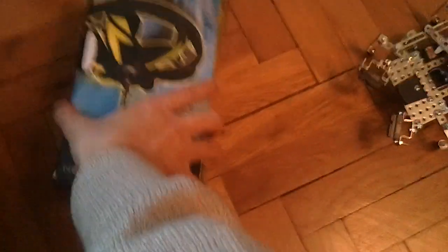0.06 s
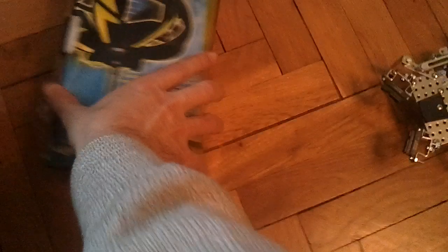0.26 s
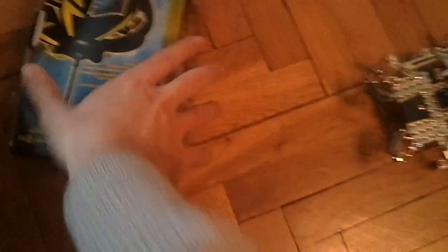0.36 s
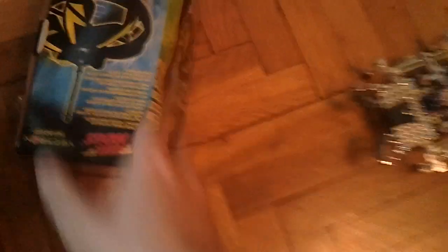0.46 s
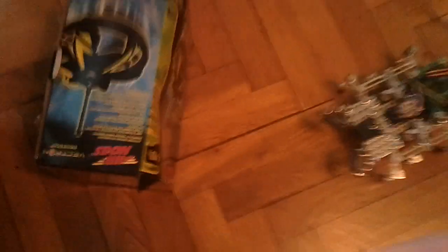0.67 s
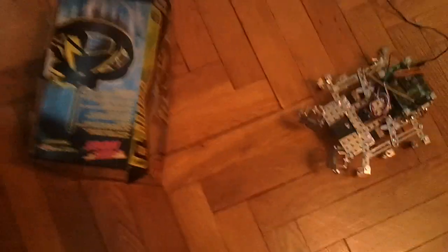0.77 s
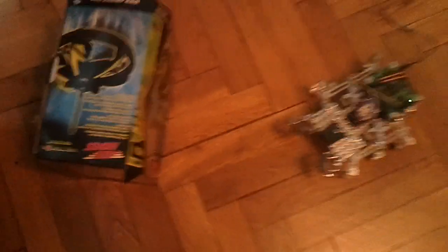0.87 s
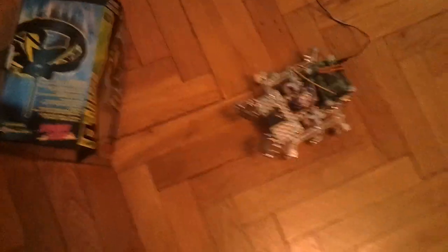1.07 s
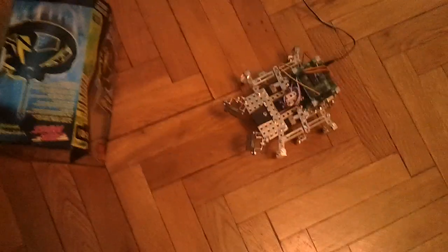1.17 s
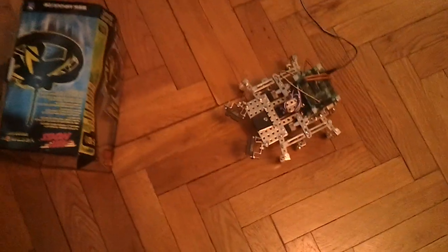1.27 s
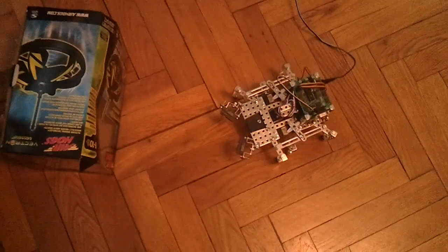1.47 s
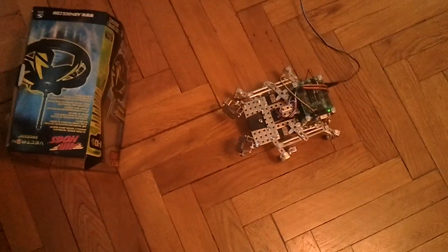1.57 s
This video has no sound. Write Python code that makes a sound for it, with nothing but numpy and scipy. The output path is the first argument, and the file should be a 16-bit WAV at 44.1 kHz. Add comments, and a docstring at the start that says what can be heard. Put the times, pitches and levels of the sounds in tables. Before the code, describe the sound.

A small robot's servos buzz while a cardboard box thumps onto a wooden floor.

```python
"""A quiet room with a wooden floor and a faint hum. A small walking robot works its servos in
three moves, gear teeth ticking and rubbing into a dense, bright buzz. Beside it a cardboard box
is lowered, scuffs along the boards and drops flat with a thump, its panels ringing briefly.
A few dry ticks and soft low bumps follow."""
import sys
import numpy as np
from scipy import signal
from scipy.fft import rfft, irfft, next_fast_len
from scipy.io import wavfile
from scipy.ndimage import uniform_filter1d, map_coordinates

SR = 44100
rng = np.random.default_rng(int(sys.argv[2]) if len(sys.argv) > 2 else 0)


def unload_audio(sound):
    """Save the sound as a 16-bit wav file, at the path given as the first command line argument."""
    columns = np.transpose(np.atleast_2d(sound))
    # keep every value between -1 and 1, then stretch to whole-number steps
    steps = np.round(np.clip(columns, -1, 1) * 32767)
    wavfile.write(sys.argv[1], SR, steps.astype(np.int16))


N = 70560
TIME = np.arange(N) / SR


def amp(db):
    return 10 ** (np.asarray(db) / 20)


def unit(x):
    """Scale to rms 1."""
    return x / np.sqrt(np.mean(x ** 2) + 1e-20)


def along(points, hz):
    """Read (Hz, value) points on a log axis."""
    freqs, values = np.transpose(points)
    return np.interp(np.log(hz + 1), np.log(freqs + 1), values)


def fader(rows):
    """Gain per sample from (seconds, dB) rows."""
    return amp(np.interp(TIME, *np.transpose(rows)))


def wobble(rate):
    """A smooth random curve, rate knots a second."""
    return map_coordinates(rng.standard_normal(1024), [TIME * rate], mode="wrap")


def decay(t60, t=TIME):
    """Fall 60 dB in t60 seconds."""
    return amp(-60 * t / t60)


def delayed(x, start):
    return np.pad(x, (round(start * SR), 0))[:N]


def filtered(x, response):
    """Shape x by a gain for each frequency."""
    size = next_fast_len(N + SR // 2)
    return irfft(rfft(x, size) * response(np.fft.rfftfreq(size, 1 / SR)), size)[:N]


def coloured(x, eq):
    """x through an EQ curve, at rms 1."""
    return unit(filtered(x, lambda hz: amp(along(eq, hz))))


def noise(eq):
    return coloured(rng.standard_normal(N), eq)


def resonance(hz, width):
    """Noise in one narrow band, rms 1."""
    return unit(filtered(rng.standard_normal(N), lambda f: 1 / (1 + (2 * (f - hz) / width) ** 2)))


def snap(eq, size=8192):
    """One minimum-phase pulse coloured by an EQ curve, peak 1."""
    cepstrum = irfft(np.log(amp(along(eq, np.fft.rfftfreq(size, 1 / SR)))))
    cepstrum[1:size // 2] *= 2
    cepstrum[size // 2 + 1:] = 0
    pulse = irfft(np.exp(rfft(cepstrum)))
    return np.pad(pulse / np.abs(pulse).max(), (0, N))[:N]


# The colour of the air. Each row: frequency in Hz, relative level in dB.
AIR_EQ = [(25, -54), (60, -9), (130, -9.5), (200, 3), (290, -0.5), (430, 0.5), (600, -4.5), (850, -3.5),
          (1400, -10.5), (2500, -11.5), (4500, -6.5), (6500, -12.5), (7500, -30.5), (9000, -44.5)]
# The room's hum. Each row: pitch in Hz, level in dB.
HUM_TONES = [(192, -63.5), (285, -58)]

def room_tone(air_db=-50):
    """A steady bed of air under a wavering hum."""
    hum = sum(amp(db + 1.7 * wobble(17)) * np.sin(2 * np.pi * hz * TIME + .8 * wobble(12))
              for hz, db in HUM_TONES)
    return amp(air_db) * noise(AIR_EQ) + hum


# How hard the servos drive. Each row: time in seconds, relative level in dB.
SERVO_FADER = [(0, -40), (.12, -39.5), (.2, -40.5), (.24, -39.5), (.34, -40), (.41, -54.5), (.45, -36.5),
               (.52, -40.5), (.71, -41.5), (.75, -44.5), (.82, -41), (.86, -48), (.99, -42.5),
               (1.05, -56.5), (1.13, -60.5), (1.185, -39.5), (1.22, -41), (1.3, -39.5), (1.57, -42.5),
               (1.6, -42.5)]
# The gear cases' colour, one curve a move. Each row: frequency in Hz, relative level in dB.
FIRST_MOVE_EQ = [(1500, -20.5), (2900, -20), (3300, -10.5), (3800, -10), (4200, -1.5), (4600, -1.5),
                 (5300, -2.5), (6200, -5), (6800, -7), (7400, -20.5), (8500, -39)]
SECOND_MOVE_EQ = [(1500, -20), (2700, -14.5), (3000, -16), (3300, -9), (3800, -11), (4100, -1.5),
                  (4900, -5.5), (5700, -6), (6200, -5.5), (6950, -7), (7500, -21.5), (8500, -39)]
THIRD_MOVE_EQ = [(1500, -32), (2900, -19), (3300, -9), (3700, -13.5), (4300, -0.5), (5000, -2.5),
                 (6050, -1.5), (6700, -5.5), (7200, -17.5), (7700, -31), (8500, -44)]
# When the second and third moves take over, in seconds.
MOVE_CHANGES = [0.45, 1.2]

def servos(tooth_hz=800, wheel_hz=45.8, teeth=2048):
    """Gear teeth tick and rub; each move rings the gear cases a little differently."""
    strike_s = (np.arange(teeth) + .25 * rng.standard_normal(teeth)) / tooth_hz
    strength = amp(2.5 * rng.standard_normal(teeth))
    clicks = np.bincount(np.abs(strike_s * SR).astype(int), strength, N)[:N]
    rub = amp(4.5) * rng.standard_normal(N)
    mesh = unit(clicks - clicks.mean()) + rub
    move = np.searchsorted(MOVE_CHANGES, TIME)
    buzz = np.zeros(N)
    for k, eq in enumerate([FIRST_MOVE_EQ, SECOND_MOVE_EQ, THIRD_MOVE_EQ]):
        crossfade = uniform_filter1d((move == k) * 1., size=1024)
        buzz += crossfade * coloured(mesh, eq)
    uneven_wheel_db = .56 * np.sin(2 * np.pi * wheel_hz * TIME)
    load_flutter_db = .99 * wobble(90)
    return buzz * fader(SERVO_FADER) * amp(uneven_wheel_db + load_flutter_db)


def early_reflections(x, count=10, span_s=.028, db=-16):
    """The floor and furniture throw back quick, weak copies."""
    return x + amp(db) * sum(delayed(x, lag) for lag in span_s * rng.random(count))


# Swells of whine. Each row: peak time and half length in seconds, pitch and width in Hz, level in dB.
WHINE_SWELLS = [(.05, 0.14, 4220, 201, -47.5), (.14, 0.017, 5360, 261, -50), (0.283, 0.053, 4950, 300, -44),
                (0.324, 0.041, 4200, 221, -41.5), (0.663, 0.092, 4120, 180, -47),
                (0.913, 0.06, 6190, 332, -49.5), (1.188, 0.022, 4750, 318, -43),
                (1.315, 0.1, 6040, 260, -51), (1.316, 0.078, 3344, 161, -56.5),
                (1.434, 0.12, 6280, 260, -53), (1.503, 0.11, 5420, 218, -49.5)]

def gear_whine():
    """Narrow gear resonances swell and sink with the load."""
    return sum(amp(db) * np.exp(-.5 * ((TIME - peak) / half) ** 2) * resonance(hz, width)
               for peak, half, hz, width, db in WHINE_SWELLS)


# The shape of the scuff. Each row: time in seconds, level in dB.
SCUFF_FADER = [(.2, -98.5), (.26, -38.5), (.32, -40), (.36, -50), (.395, -37.5), (.43, -44), (.47, -38.5),
               (.52, -85)]
# Its colour. Each row: frequency in Hz, relative level in dB.
SCUFF_EQ = [(50, -23.5), (150, -9), (300, 3.5), (490, 3.5), (700, -17), (1100, -17.5), (2000, -14),
            (6000, -48)]

def box_scuff():
    """The sliding edge of the box catches unevenly on the boards."""
    return noise(SCUFF_EQ) * fader(SCUFF_FADER) * amp(1.5 * wobble(120))


# The box's modes on the boards. Each row: pitch in Hz, relative level in dB, tail T60 in seconds.
BOX_MODES = [(144, -35, .25), (191, -13.5, 0.081), (265.3, -4.5, 0.067), (344, -6.5, 0.099),
             (389.2, -2, 0.29), (471, 0, 0.31), (607, -12, 0.28), (779, -11.5, 0.1), (852, -14.5, 0.16),
             (903, -11, 0.21), (1066, -5.5, 0.25), (1152, -9, .14), (1235, -10, 0.082), (1824, -11.5, 0.2),
             (2700, -14.5, 0.11)]

def box_ring(damped_t60=.12, tail_db=-3):
    """Most of the ring is damped at once and a weaker tail follows; floppy card detunes each mode."""
    ring = np.zeros(N)
    for k, (hz, db, t60) in enumerate(BOX_MODES):
        drift = .37 * wobble(75)
        envelope = decay(damped_t60) + amp(tail_db) * decay(t60)
        ring += (-1) ** k * amp(db) * envelope * np.sin(2 * np.pi * hz * TIME + drift - drift[0])
    return ring


# The card's broad colour. Each row: frequency in Hz, relative level in dB.
CRACK_EQ = [(30, -56.5), (80, -15), (200, -9), (380, -1.5), (600, -5), (1200, -14.5), (1600, -10.5),
            (3000, -19), (7000, -23.5), (9000, -48.5)]
# How it dies away. Each row: frequency in Hz, T60 in seconds.
CRACK_DECAY = [(100, 0.24), (400, 0.32), (1200, .22), (4000, 0.19)]

def panel_crack():
    """Struck card answers with a noise burst, each band dying at its own rate."""
    hz, times, bands = signal.stft(noise(CRACK_EQ), SR, nperseg=256)
    envelopes = decay(along(CRACK_DECAY, hz)[:, None], times)
    return signal.istft(bands * envelopes, SR, nperseg=256)[1][:N]


# A hard slap of card on wood. Each row: frequency in Hz, relative level in dB.
SLAP_EQ = [(40, -43.5), (150, -16), (400, 7), (700, 9.5), (1100, 14), (1500, 8), (2700, -11.5), (4000, -16),
           (7000, -24.5), (9000, -48)]
# The box meets the floor. Each row: start in seconds, overall gain in dB, treble roll-off in Hz,
# crack gain and ring gain in dB, push pitch in Hz, push gain in dB.
BOX_HITS = [(0.225, -28.5, 600, -6, -3.5, 266, 4.5), (.2435, -38, 1800, 0, -13, 276, -3),
            (0.301, -34.5, 650, -1, -8.5, 160, -3.5), (0.325, -42, 713, 6.5, -5.5, 146, -3),
            (0.385, -41.5, 350, -2, -5, 142, 0), (.476, -22, 3500, -3.5, -2.5, 334, 1.5),
            (0.4838, -40.5, 800, 8.5, 0.5, 185, 11), (0.4953, -25, 2190, -2.5, -7.5, 455, -26),
            (.554, -45, 1200, 8, -13, 122, -15)]

def box_knocks(attack_s=.00022, push_t60=.087):
    """Each hit slaps, pushes a panel for a few cycles and rings the box; soft hits lose their treble."""
    slap = amp(.5) * snap(SLAP_EQ)
    attack = 1 - np.exp(-TIME / attack_s)
    knocks = np.zeros(N)
    for start, db, rolloff_hz, crack_db, ring_db, push_hz, push_db in BOX_HITS:
        crack = amp(crack_db) * panel_crack()
        push = amp(push_db) * np.sin(2 * np.pi * push_hz * TIME) * decay(push_t60)
        hit = slap + (amp(ring_db) * box_ring() + crack + push) * attack
        softened = signal.lfilter(*signal.butter(1, rolloff_hz, fs=SR), hit)
        knocks += amp(db) * delayed(softened, start)
    return knocks


# Light grazes. Each row: start in seconds, level in dB, pitch and width in Hz, T60 in seconds.
EDGE_GRAZES = [(0.396, -46, 1123, 197, 0.67), (0.4421, -31, 1063, 169, 0.073),
               (.442, -40, 2390, 2610, 0.12)]

def edge_taps():
    """The box's edge grazes the floor just before the drop."""
    return sum(amp(db) * delayed(resonance(hz, width) * decay(t60), start)
               for start, db, hz, width, t60 in EDGE_GRAZES)


# Soft low bumps. Each row: start in seconds, gain in dB, pitch in Hz, T60 in seconds.
LOW_THUDS = [(1.059, -37.5, 62, 0.068), (1.124, -37, 112, 0.031), (1.15, -38, 118, 0.054),
             (1.152, -42, 48.3, 0.24), (1.178, -54, 150, .05), (1.239, -44, 63, 0.1)]

def low_bumps():
    """Dull thuds, a few cycles each."""
    return sum(amp(db) * delayed(np.sin(2 * np.pi * hz * TIME) * decay(t60), start)
               for start, db, hz, t60 in LOW_THUDS)


# The colour of a tick. Each row: frequency in Hz, relative level in dB.
TICK_EQ = [(40, -16), (150, -4.5), (500, 5), (2000, 0.5), (5000, 2.5), (6800, -4), (8500, -36.5)]
# The ticks. Each row: start in seconds, gain in dB, treble roll-off in Hz.
TICK_HITS = [(1.0595, -21, 9000), (1.0628, -49, 3000), (1.281, -29, 2600), (1.4456, -24, 1700),
             (1.446, -30, 900)]

def dry_ticks():
    """Small single pulses, bright or dull, with no ring."""
    pulse = snap(TICK_EQ)
    return sum(amp(db) * delayed(signal.lfilter(*signal.butter(4, rolloff_hz, fs=SR), pulse), start)
               for start, db, rolloff_hz in TICK_HITS)


def scene():
    """Robot, box, ticks and bumps over the room tone, in mono."""
    robot = amp(-2) * early_reflections(servos()) + gear_whine()
    box = box_knocks() + box_scuff() + edge_taps()
    return (robot + box + dry_ticks() + low_bumps() + room_tone())[None]


def record(dry, low_cut_hz=83, top_hz=8900):
    """Master EQ: roll off the deepest bass and cut the top treble dead."""
    thinned = signal.sosfilt(signal.butter(3, low_cut_hz, "high", fs=SR, output="sos"), dry)
    return np.array([filtered(channel, lambda hz: hz < top_hz) for channel in thinned])


dry = scene()
out = record(dry)
unload_audio(out)
```